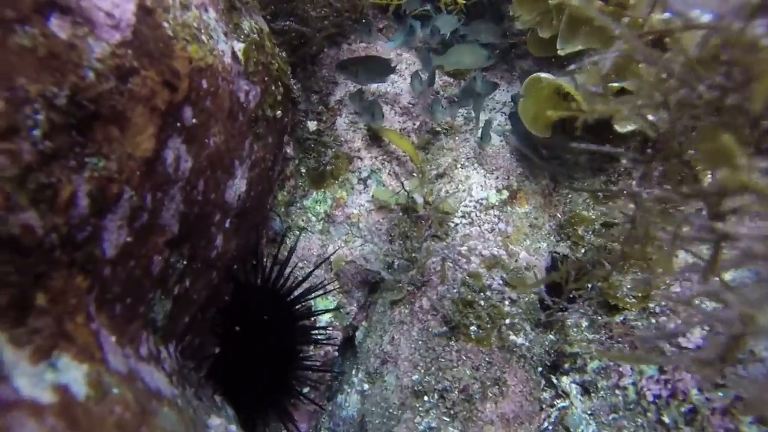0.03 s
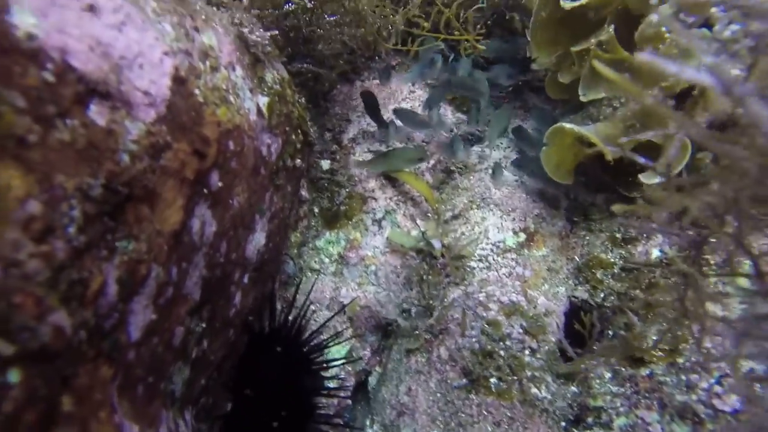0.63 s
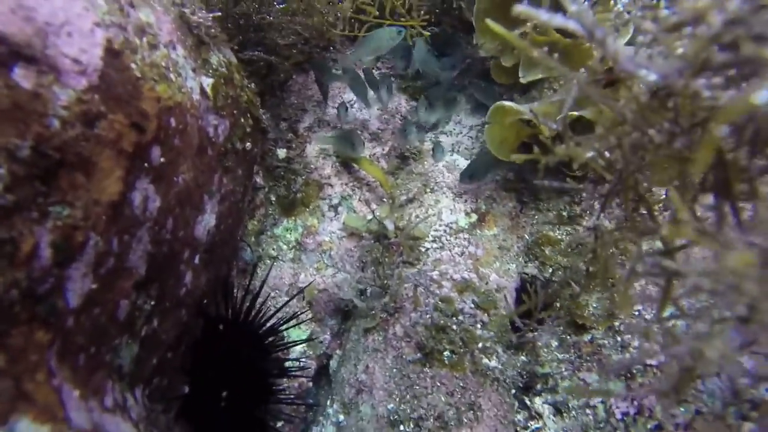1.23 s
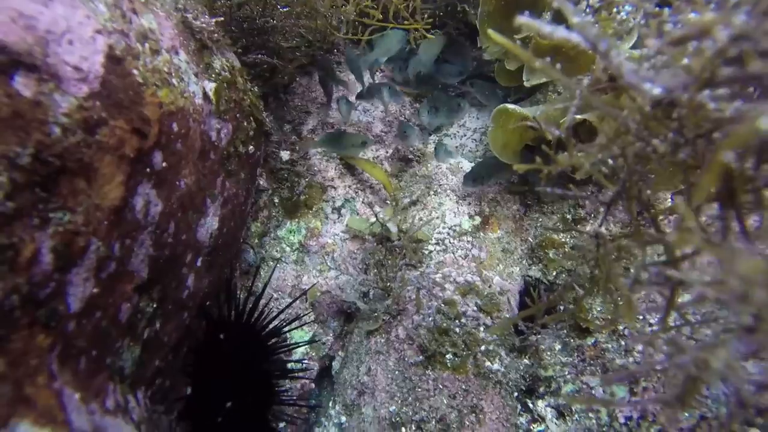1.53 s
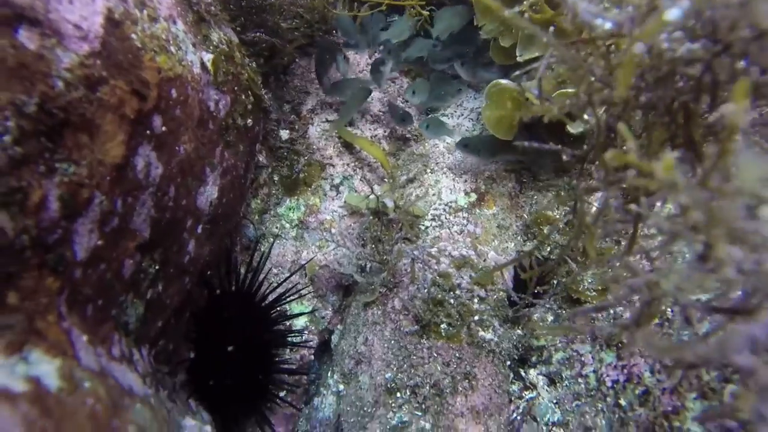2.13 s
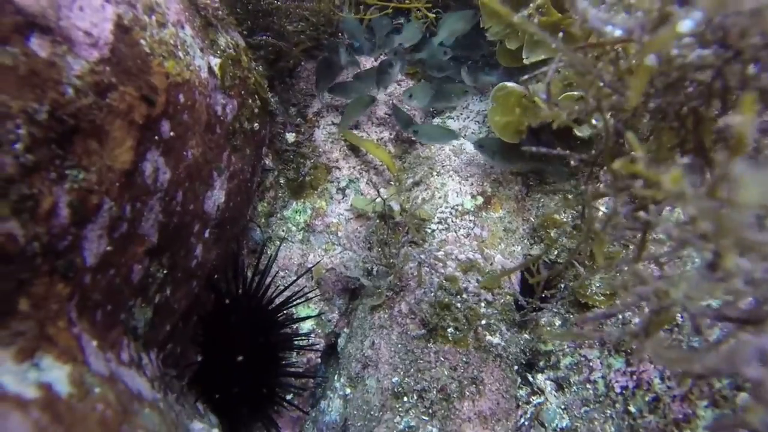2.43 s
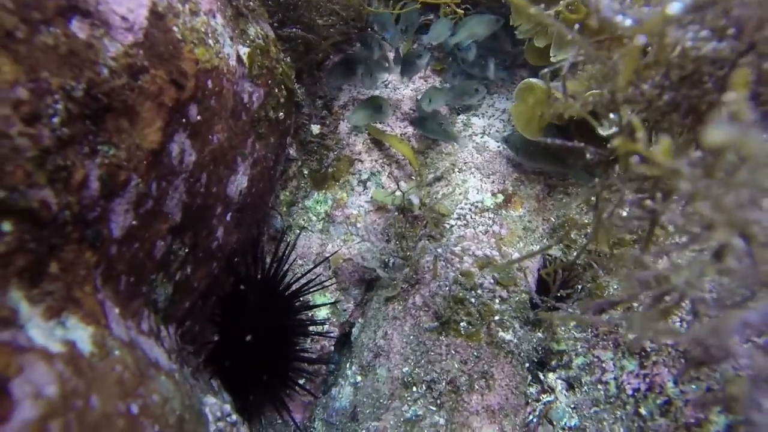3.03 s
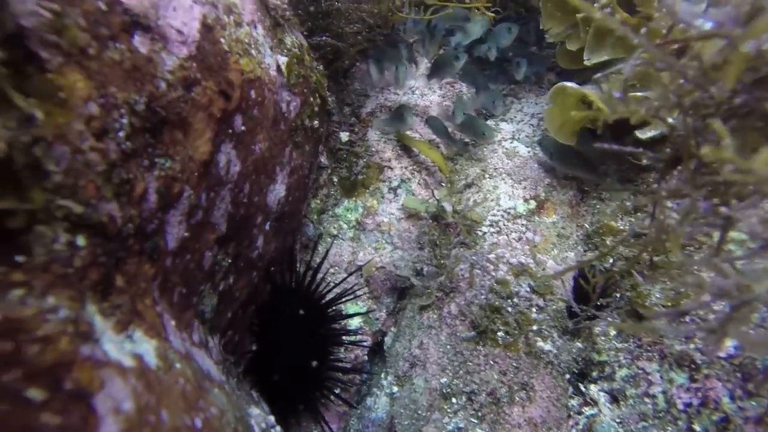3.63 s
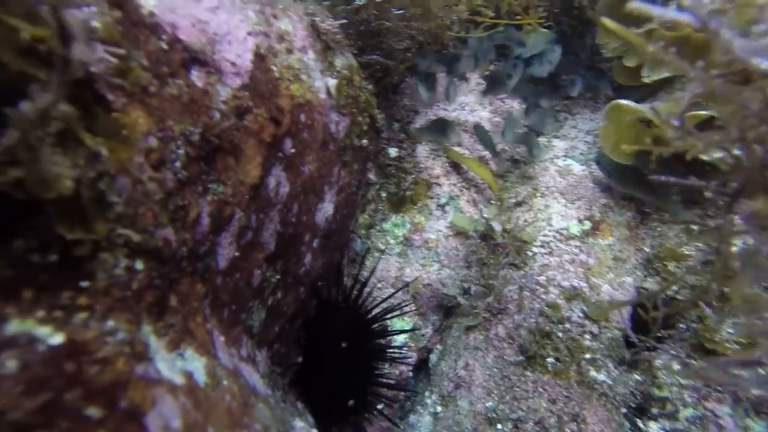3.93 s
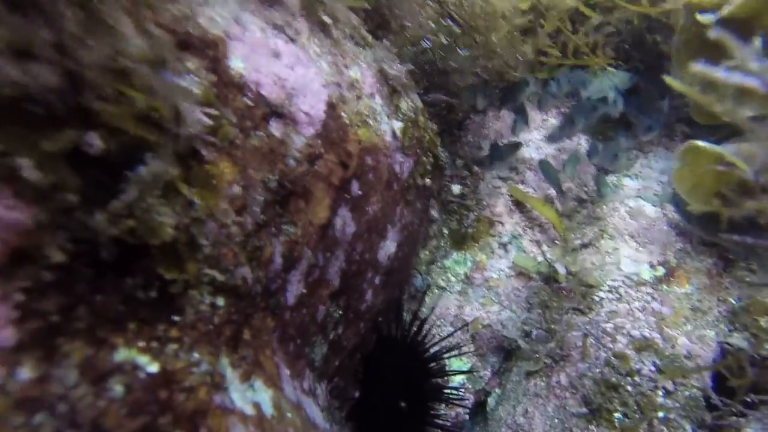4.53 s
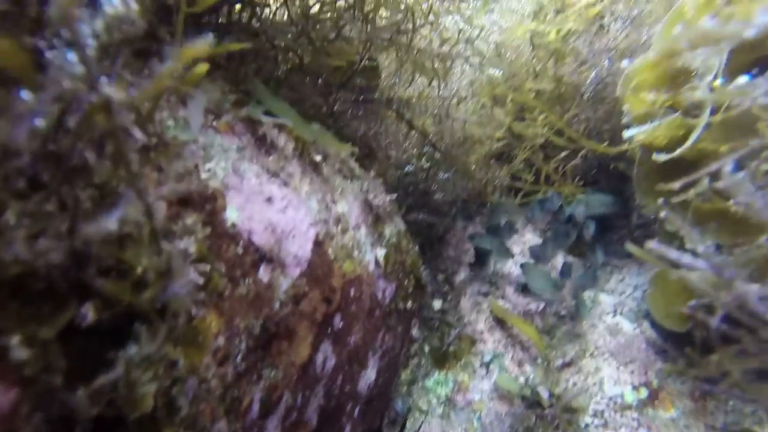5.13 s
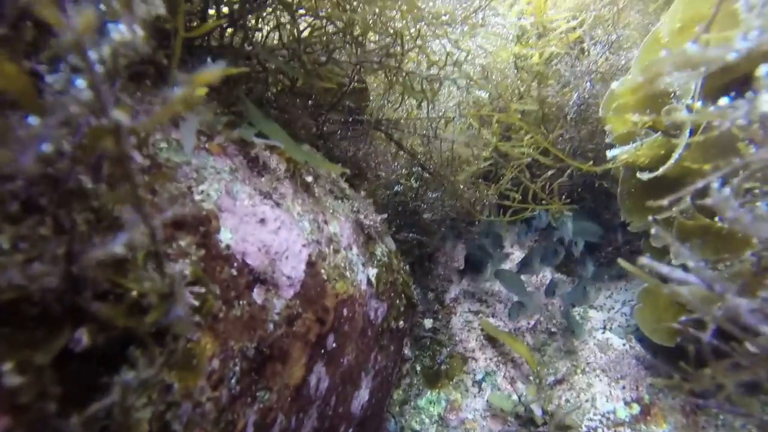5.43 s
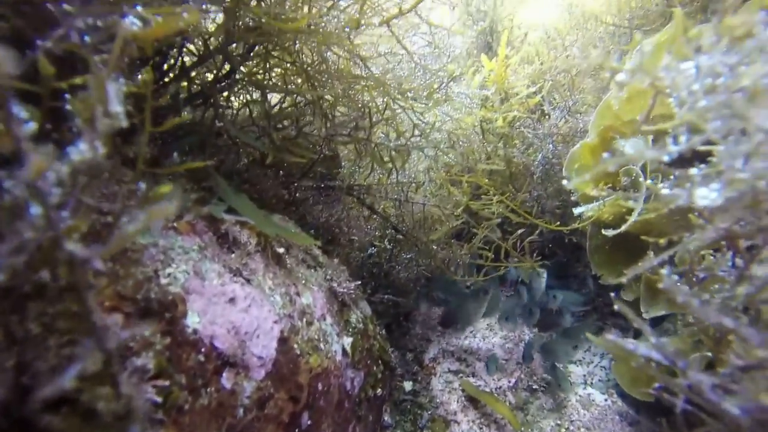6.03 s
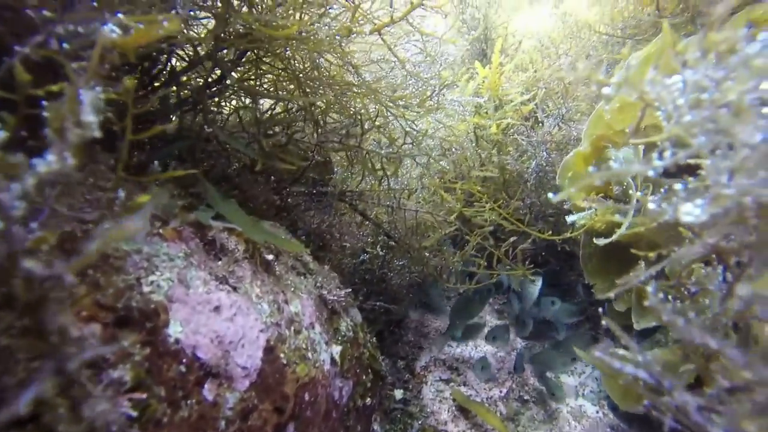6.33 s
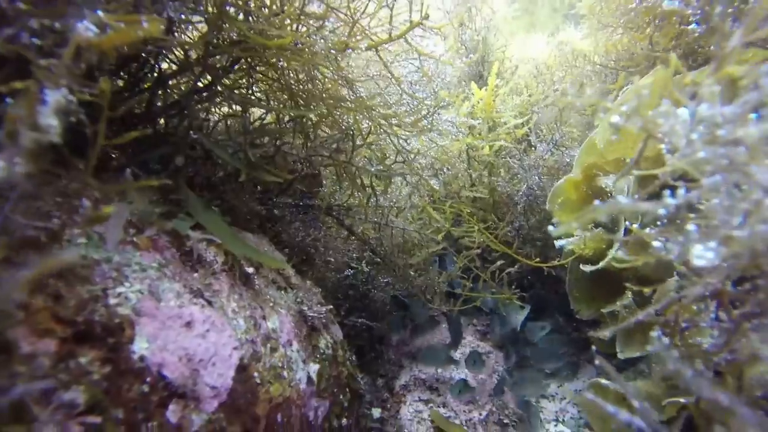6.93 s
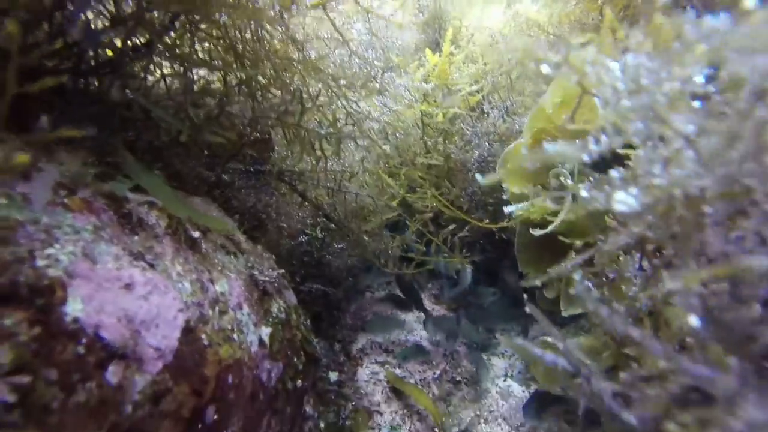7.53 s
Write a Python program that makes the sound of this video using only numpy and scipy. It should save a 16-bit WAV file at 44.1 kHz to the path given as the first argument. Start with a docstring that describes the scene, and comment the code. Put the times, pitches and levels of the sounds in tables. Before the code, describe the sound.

A faint low rumble of moving water and a soft, steady hiss fill a rocky tide pool, heard underwater from inside a waterproof housing. Small bubbles gulp and tick now and then. Past the middle, the gurgling and a faint crackle pick up and the rumble swells. Near the end, grit and seaweed click briefly against the case, and the water gives a few dull bumps.

```python
"""A rocky tide pool, heard from a camera drifting in a watertight housing.
Eddies in the surge press on the housing as a low rumble with dull bumps, under a soft, steady hiss.
Bubbles ring as the air in them springs against the water: large ones gulp and gurgle, tiny ones
burst in ticks and a faint crackle. Grains of grit strike the case, and now and then a frond of
weed slides over it; both excite its resonances."""
import sys
import numpy as np
from scipy import signal
from scipy.fft import rfft, irfft, next_fast_len
from scipy.io import wavfile
from scipy.ndimage import uniform_filter1d

SR = 44100
rng = np.random.default_rng(int(sys.argv[2]) if len(sys.argv) > 2 else 0)


def store_pcm(level_fs):
    """Save levels as 16-bit WAV."""
    pcm = np.round(np.clip(level_fs, -1, 1) * 32767).astype(np.int16)
    wavfile.write(sys.argv[1], SR, np.atleast_2d(pcm).T)


N = 343539
TIME = np.arange(N) / SR
TICK_AGE = np.arange(int(0.03 * SR)) / SR  # seconds since a burst or a blow began
TOP_HZ = 15050  # upper edge of the camera's passband

# Strength of the flow past the housing: time_s, level_db
SURGE_LEVELS = [(0, -48), (0.4, -48.5), (0.9, -47), (1.15, -54.5), (1.45, -53.5), (2.3, -52.5), (3.2, -51),
                (4.35, -50.5), (4.6, -46.5), (5.1, -44), (5.55, -43.5), (6.25, -43.5), (6.65, -43),
                (7.1, -47), (7.79, -42.5)]
# Spectrum of the eddy pressure on the housing: frequency_hz, relative_db
EDDY_SPECTRUM = [(8, -4.5), (18, 1.5), (28, -2.5), (40, -2.5), (54, -9), (80, -15.5), (110, -23),
                 (170, -31.5), (300, -44), (800, -82)]
# Strong eddies that bump the housing: centre_s, pitch_hz, level_db
EDDY_BUMPS = [(0.497, 28.7, -33), (0.621, 33, -32), (0.712, 32.7, -33), (1.154, 40.4, -35.5),
              (2.282, 34.2, -34), (2.604, 68, -40), (3.216, 33, -35.5), (4.803, 33.7, -29.5),
              (4.91, 31.4, -32), (6.02, 51.3, -31.5), (6.621, 52.4, -32), (6.783, 37.7, -28),
              (6.958, 55, -39), (7.298, 38, -31), (7.385, 37.7, -27), (7.534, 30.3, -29.5),
              (7.636, 37, -28.5), (7.741, 35, -23)]
# Spectrum of the steady hiss: frequency_hz, relative_db
HISS_SPECTRUM = [(40, 0), (120, 3), (220, 1.5), (400, -3), (700, -6), (1200, -10), (2000, -12.5),
                 (3200, -16.5), (5000, -20.5), (8000, -26.5), (11000, -32), (15000, -40)]
# Nearby bubbles: start_s, starting_pitch_hz, peak_db
NEAR_BUBBLES = [(.04, 338, -51.5), (0.116, 342, -53), (.615, 172, -49.5), (1.306, 195, -50),
                (1.615, 730, -57), (3.108, 330, -44), (3.111, 480, -53), (3.486, 234, -48),
                (4.586, 305, -48), (4.801, 212, -50.5), (4.899, 213, -52), (5.161, 258, -56),
                (5.205, 208, -47), (5.221, 285, -50), (5.249, 216, -49.5), (6.34, 192, -50.5),
                (6.528, 210, -50.5), (6.596, 120, -44.5), (6.603, 167, -55), (6.935, 121, -47.5),
                (7.008, 193, -52), (7.046, 650, -55), (7.084, 580, -48), (7.669, 202, -48)]
# Tiny bubbles bursting on the weed: start_s, level_db, pitch_hz, decay_s
BUBBLE_BURSTS = [(.418, -49, 990, 0.0022), (0.6555, -40, 1450, 0.0019), (.799, -45.5, 2520, 0.0019),
                 (.7991, -49.5, 3450, 0.00072), (0.8032, -51, 2470, .003), (1.8385, -53, 2680, .0025),
                 (2.391, -50, 3000, .0015), (2.4496, -49, 2900, .0014), (2.9338, -50.5, 2700, 0.002),
                 (4.2035, -49, 2750, .0014), (4.219, -50, 2850, .0014), (4.253, -54, 4100, .0016),
                 (4.261, -52, 2550, .0016), (4.310, -54, 2650, .0016), (4.597, -50, 1950, 0.0015),
                 (4.6415, -44.5, 1180, .0018), (4.6976, -45.5, 2650, 0.001), (4.8818, -47, 2120, .0014),
                 (4.8817, -52.5, 3900, .0012), (4.8935, -51, 2400, .002), (5.231, -46, 1090, .0013),
                 (5.231, -50, 2600, .0017), (6.927, -43, 2840, .0013), (7.0893, -47, 2930, .0008)]
# Grit striking the case: start_s, peak_db, cutoff_hz
GRIT_IMPACTS = [(0.654, -41.5, 8000), (.6558, -45, 3500), (4.5952, -44.5, 2200), (4.616, -50, 2200),
                (4.6968, -46, 14000), (4.8817, -54, 3500), (5.2313, -51, 2000), (6.618, -51, 14000),
                (6.6244, -38.5, 5500), (6.627, -44, 4500), (6.631, -47, 5000), (6.6358, -42, 4000),
                (6.638, -50, 4000)]
# Resonant modes of the plastic case: frequency_hz, bandwidth_hz, gain_db
CASE_MODES = [(1040, 150, 3.5), (1780, 260, 7.5), (2380, 240, -2.5), (2780, 230, -6.5), (3600, 330, -9),
              (4230, 250, -4), (5670, 700, -11.5), (6700, 240, -3.5), (8400, 420, -11.5), (11500, 800, -12)]
# Weed brushing the case: strongest_s, level_db, release_s, cutoff_hz
WEED_CONTACTS = [(4.597, -59.5, .04, 2300), (6.620, -53.5, .018, 10000), (7.722, -59.5, 0.016, 8000)]


def undb(db):
    """Amplitude grows tenfold for every 20 decibels."""
    return 10 ** (np.asarray(db) / 20)


def unit(x):
    """Normalisation to an rms of 1."""
    return x / np.sqrt(np.mean(x ** 2))


def colour(x, spectrum):
    """Spectral shaping by gains interpolated over log frequency; the result has rms 1."""
    hz, db = np.transpose(spectrum)
    size = next_fast_len(N)
    bin_hz = np.maximum(np.fft.rfftfreq(size, 1 / SR), 1)
    gain = undb(np.interp(np.log(bin_hz), np.log(hz), db))
    return unit(irfft(rfft(x, size) * gain, size)[:N])


def resonate(x, hz, bandwidth_hz):
    """A second-order resonance with unit gain at its centre."""
    return signal.lfilter(*signal.iirpeak(min(hz, TOP_HZ), hz / bandwidth_hz, fs=SR), x)


def soften(x, cutoff_hz):
    """Low-pass filtering: a wet contact carries little treble."""
    return signal.sosfilt(signal.butter(2, min(cutoff_hz, TOP_HZ), fs=SR, output="sos"), x)


def wander(rate_hz):
    """Slow fluctuation: a moving average of random steps, with rms 1."""
    hold = int(SR / rate_hz)
    steps = np.repeat(rng.standard_normal(N // hold + 1), hold)
    return unit(uniform_filter1d(steps, hold)[:N])


def impulses(per_s, spread_db):
    """A Poisson process: independent impulses of uneven size."""
    occurs = rng.random(N) < per_s / SR
    return occurs * undb(spread_db * np.clip(rng.standard_normal(N), -2, 2))


def add(out, start_s, sound):
    """Superposition: a short sound adds to the mix from its start time."""
    first = max(int(start_s * SR), 0)
    part = out[first:first + len(sound)]
    part += sound[:len(part)]


def eddy_rumble(surge_db, above_surge_db=3.5, gust_db=2):
    """Turbulent pressure: eddies load the housing in uneven gusts, the strongest as separate bumps."""
    eddies = impulses(per_s=160, spread_db=3)
    pressure = colour(eddies - eddies.mean(), EDDY_SPECTRUM)
    out = pressure * undb(surge_db + above_surge_db + gust_db * wander(rate_hz=9))
    for centre_s, pitch_hz, level_db in EDDY_BUMPS:
        half_s = 0.94 / pitch_hz  # just under one cycle on each side
        t = np.arange(-half_s, half_s, 1 / SR)
        wave = np.sin(2 * np.pi * (pitch_hz * t + rng.random()))
        add(out, centre_s - half_s, undb(level_db) * np.hanning(len(t)) ** 2 * wave)
    return out


def hiss(level_db=-56.5, waver_db=0.38):
    """Broadband noise with a spectrum falling toward the treble is heard as a soft, even hiss."""
    noise = colour(rng.standard_normal(N), HISS_SPECTRUM)
    return noise * undb(level_db + waver_db * wander(rate_hz=5.4))


def whine(pitch_hz=8871, rms_db=-99.5):
    """A pure tone: the thin whine of the electronics."""
    return undb(rms_db) * np.sqrt(2) * np.sin(2 * np.pi * pitch_hz * TIME)


def bubble(pitch_hz, glide=0.25, swell_share=0.17):
    """Bubble resonance: trapped air is the spring, water the mass; the tone swells, rises and fades."""
    length_s = 0.059 * (241 / pitch_hz) ** 0.75  # smaller, higher bubbles fade sooner
    progress = np.linspace(0, 1, int(SR * length_s))
    envelope = (progress / swell_share) ** 2 * np.exp(2 * (1 - progress / swell_share))
    rising_hz = pitch_hz * (1 + glide * progress)
    return envelope * np.sin(2 * np.pi * np.cumsum(rising_hz) / SR)


def gurgle(surge_db, per_s=110, low_hz=120, high_hz=440, spread_db=5.5, base_db=-70.5):
    """Many bubble resonances overlap in the rocks, a little louder as the surge strengthens."""
    out = np.zeros(N)
    for when, pitch, size in rng.random((int(per_s * N / SR), 3)):
        pitch_hz = low_hz * (high_hz / low_hz) ** pitch
        add(out, when * N / SR, undb(spread_db * (2 * size - 1)) * bubble(pitch_hz))
    churn_db = 8 * np.exp(-((TIME - 4.44) / 0.57) ** 2)  # water churns as the camera swings round
    return unit(out) * undb(base_db + churn_db + 0.12 * (surge_db - surge_db.mean()))


def pip(pitch_hz, decay_s, rise_s=0.00011):
    """Damped oscillation: a tiny bubble rings and dies within a few milliseconds."""
    envelope = np.exp(-TICK_AGE / decay_s) * (1 - np.exp(-TICK_AGE / rise_s))
    return envelope * np.sin(2 * np.pi * pitch_hz * TICK_AGE)


def crackle(per_s=170, centre_hz=2300, spread_octaves=0.85, spread_db=3, base_db=-79.5):
    """Shot noise: distant bubbles burst at random in faint, dry snaps, each at its own pitch."""
    out = np.zeros(N)
    for when, pitch, chance in rng.random((int(per_s * N / SR), 3)):
        pitch_hz = centre_hz * 2 ** (spread_octaves * (2 * pitch - 1))
        snap_db = -spread_db * np.log(max(chance, 0.05))  # loud snaps are rare
        add(out, when * N / SR, undb(snap_db) * pip(pitch_hz, decay_s=0.001))
    turn_db = 8 * np.exp(-((TIME - 4.7) / 0.98) ** 2)  # the camera turns through the weed
    return unit(out) * undb(base_db + turn_db)


def gulps():
    """Nearby bubbles oscillate in volume, each heard as a separate gulp."""
    out = np.zeros(N)
    for start_s, pitch_hz, peak_db in NEAR_BUBBLES:
        add(out, start_s, undb(peak_db) * bubble(pitch_hz))
    return out


def ticks(crack_decay_s=0.00071, crack_relative_db=-8):
    """Transient and free decay: a bursting bubble gives a muffled crack and rings as a pitched pip."""
    out = np.zeros(N)
    for start_s, level_db, pitch_hz, decay_s in BUBBLE_BURSTS:
        burst = rng.standard_normal(len(TICK_AGE)) * np.exp(-TICK_AGE / crack_decay_s)
        crack = soften(resonate(burst, pitch_hz, bandwidth_hz=0.7 * pitch_hz), cutoff_hz=4000)
        crack = undb(crack_relative_db) * crack / np.abs(crack).max()
        add(out, start_s, undb(level_db) * (pip(pitch_hz, decay_s) + crack))
    return out


def case_response(force):
    """Modal response: the plastic case answers a force with the sum of its damped resonances."""
    return sum(undb(db) * resonate(force, hz, bandwidth_hz) for hz, bandwidth_hz, db in CASE_MODES)


def grit_knocks(scrape_share=0.18, scrape_decay_s=0.0015):
    """Impact excitation: a grain strikes, scrapes and rings the case; softer contacts are duller."""
    out = np.zeros(N)
    for start_s, peak_db, cutoff_hz in GRIT_IMPACTS:
        force = scrape_share * rng.standard_normal(len(TICK_AGE)) * np.exp(-TICK_AGE / scrape_decay_s)
        force[0] = 1  # the blow itself
        knock = soften(case_response(force), cutoff_hz)
        add(out, start_s, undb(peak_db) * knock / np.abs(knock).max())
    return out


def weed_brushes(attack_s=0.003):
    """Stick-slip friction: a frond drives the case with a run of tiny slips that swells and dies."""
    slips = impulses(per_s=2300, spread_db=1) * rng.choice([-1, 1], N)
    rubbing = case_response(slips)
    out = np.zeros(N)
    for strongest_s, level_db, release_s, cutoff_hz in WEED_CONTACTS:
        width_s = np.where(TIME < strongest_s, attack_s, release_s)
        contact = np.exp(-((TIME - strongest_s) / width_s) ** 2)
        out += undb(level_db) * contact * unit(soften(rubbing, cutoff_hz))
    return out


def scene():
    """Linear superposition: all sources sum in the one channel of the microphone in the housing."""
    surge_db = np.interp(TIME, *np.transpose(SURGE_LEVELS))
    background = eddy_rumble(surge_db) + hiss() + gurgle(surge_db) + whine()
    events = gulps() + ticks() + grit_knocks() + weed_brushes()
    return (background + events + crackle())[None]


def record(dry):
    """Band limiting: the camera's steep low-pass filter removes the highest treble."""
    return signal.sosfilt(signal.ellip(10, 0.1, 70, TOP_HZ, fs=SR, output="sos"), dry)


dry = scene()
out = record(dry)
store_pcm(out)
```